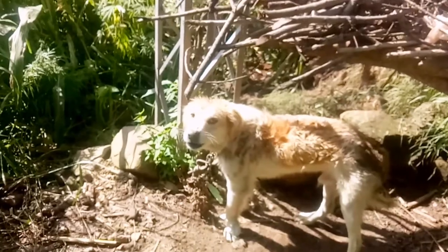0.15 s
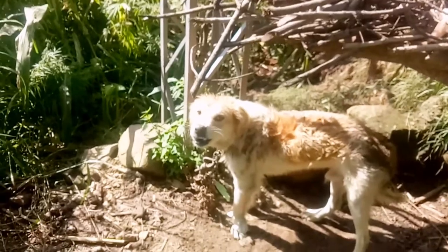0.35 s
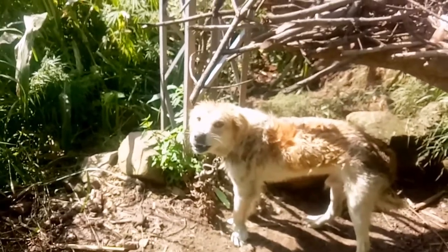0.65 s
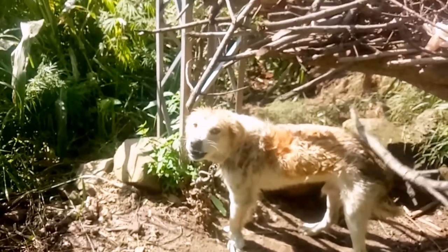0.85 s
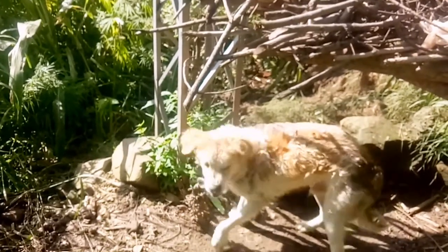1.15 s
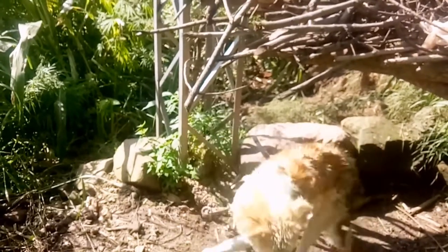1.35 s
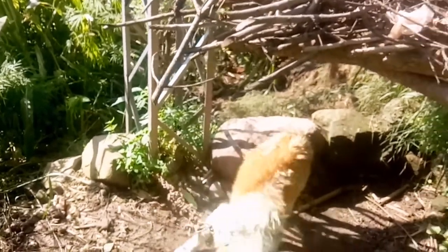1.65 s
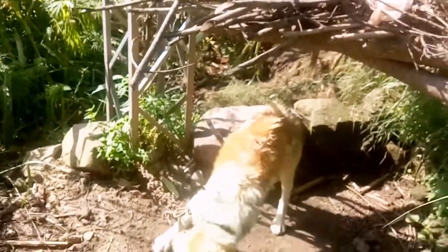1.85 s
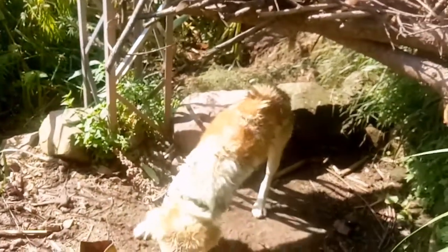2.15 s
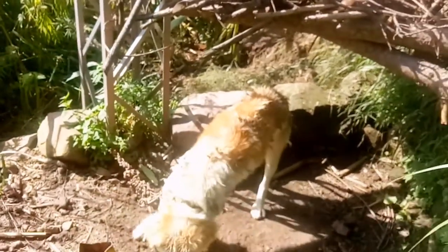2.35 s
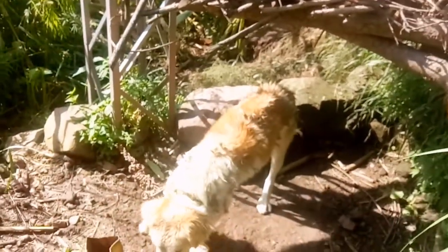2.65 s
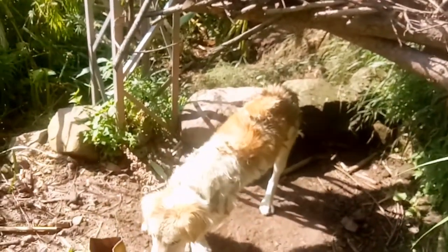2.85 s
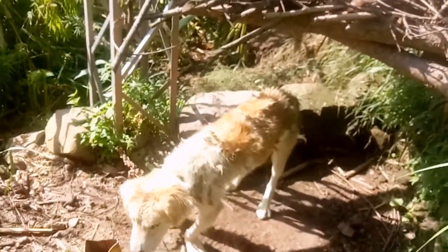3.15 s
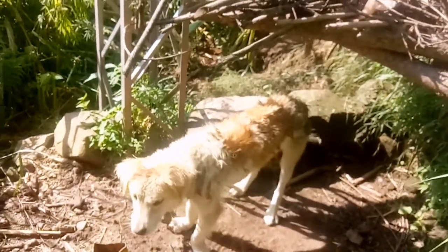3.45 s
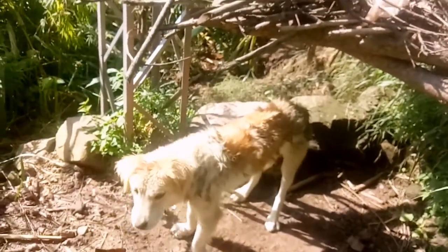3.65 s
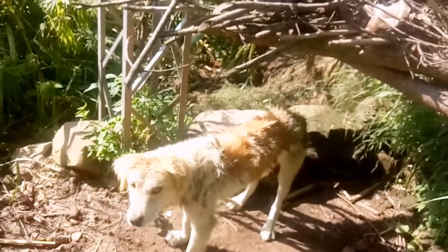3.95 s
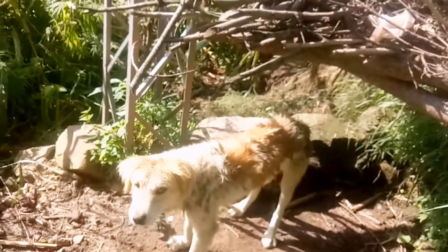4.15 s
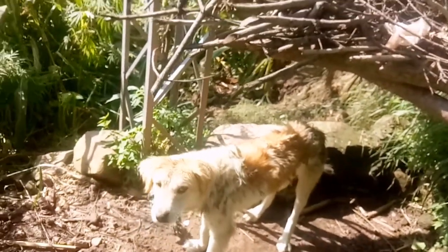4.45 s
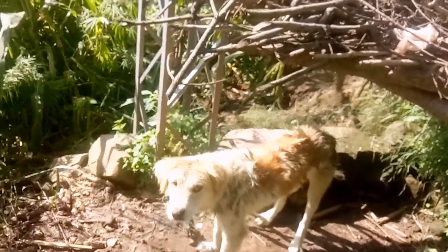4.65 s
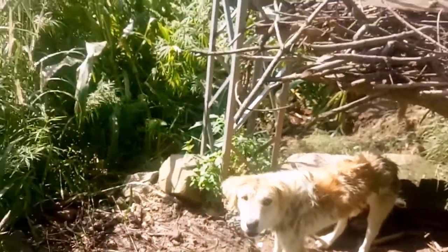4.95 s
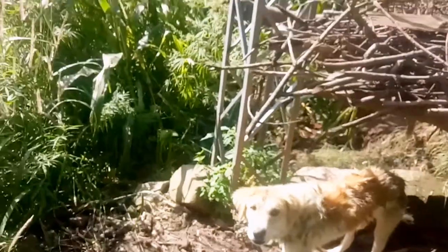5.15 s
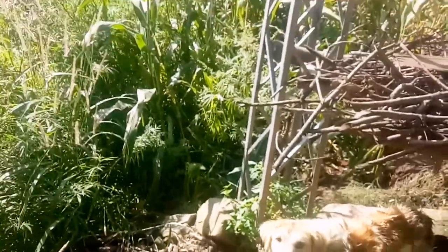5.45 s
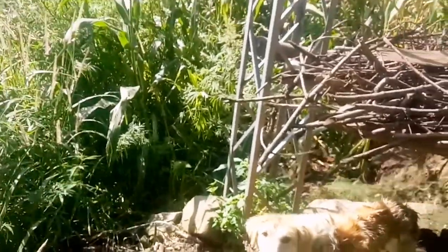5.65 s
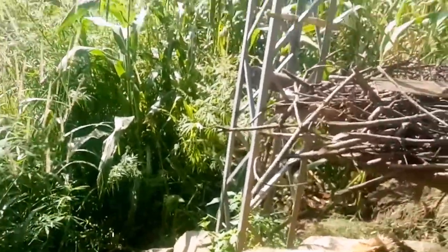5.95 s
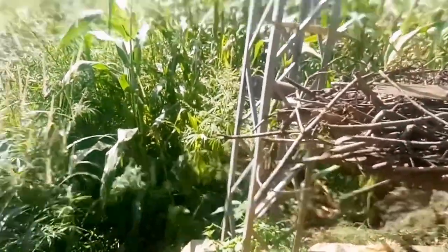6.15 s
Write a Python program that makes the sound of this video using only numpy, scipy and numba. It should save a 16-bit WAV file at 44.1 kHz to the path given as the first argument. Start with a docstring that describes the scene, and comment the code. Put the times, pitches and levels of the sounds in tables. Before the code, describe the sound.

Outdoors in a leafy yard, a thin high insect chorus and soft air continue throughout, with a nearer insect swelling now and then. From 0 to 1.2 s a close dog growls low and throaty, fluttering about 25 times a second with tiny gaps. A jaw snap and raspy puff lead into two explosive, hoarse barks at about 1.2-1.4 and 1.43-1.65 s, overloading the microphone, with faint dull echoes. A wet rattling snarl follows until 1.9 s, with paws scuffing litter. From 2.2 to 3.1 s a pitched, hoarse growl is held, becoming muffled as the mouth closes. Sharp jaw snaps and a brief soft snarl come around 3.15-3.35 s, then tiny lip smacks. Light scuffs, twig cracks and low bumps occupy 4-5 s. Softer closed-mouth throbs run from 5.25 s to the end at 6.3 s, under heavy handling knocks and rubbing from 5.8 s.

```python
"""Throbbing growls from a dog in a sunny yard come first, over insects buzzing in the plants.
Two sharp barks, begun with raspy puffs of breath, overload the input; then come a snarl, a pitched
growl held as the mouth closes, jaw snaps and softer throbs. Paws scuff dry litter, and the hand-held
microphone is jostled at the end. The voice is fold pulses, tones and noise through resonances;
the rest is coloured noise in timed swells and bursts, plus decaying tones for the bumps."""
import sys
import numpy as np
from scipy import signal
from scipy.fft import rfft, irfft, next_fast_len
from scipy.io import wavfile
from scipy.ndimage import uniform_filter1d, map_coordinates
from numba import njit

SR = 44100
rng = np.random.default_rng(int(sys.argv[2]) if len(sys.argv) > 2 else 0)


def to_wav(s):
    """Save 16-bit WAV."""
    ch = np.atleast_2d(s).T  # columns
    pcm = np.round(np.clip(ch, -1, 1) * 32767)  # PCM
    wavfile.write(sys.argv[1], SR, pcm.astype(np.int16))


N = 277256
TIME = np.arange(N) / SR


def from_db(db):
    """Amplitude gain of a level in dB."""
    return 10 ** (np.asarray(db) / 20)


def rms_one(x):
    """The same sound scaled to rms 1."""
    return x / np.sqrt(np.mean(x ** 2) + 1e-20)


def in_time(rows):
    """Each column of a curve, joined by straight lines, at every sample."""
    s, *columns = np.transpose(rows)
    return [np.interp(TIME, s, c) for c in columns]


def during(rows, fade=0.0052):
    """One while a curve lasts, fading to nothing outside it within fade seconds."""
    return np.clip(1 + np.minimum(TIME - rows[0][0], rows[-1][0] - TIME) / fade, 0, 1)


def drift(rate):
    """Random wander: rate new values a second, of spread 1, joined by straight lines."""
    knots = np.arange(int(N / SR * 2000) + 2) / rate
    return np.interp(TIME, knots, rng.standard_normal(len(knots)))


def coloured(x, spectrum):
    """Causal (minimum-phase) filter with the given (frequency [Hz], level [dB]) response."""
    size = next_fast_len(N + SR // 10, real=True) // 2 * 2
    hz, db = np.transpose(spectrum)
    bin_hz = np.arange(size // 2 + 1) * SR / size
    log_gain = np.log(from_db(np.interp(np.log(bin_hz + 1), np.log(hz), db)))
    # folding the cepstrum to positive times makes the phase minimal
    cepstrum = irfft(log_gain, size)[:size // 2]
    cepstrum[1:] *= 2
    return irfft(rfft(x, size) * np.exp(rfft(cepstrum, size)), size)[..., :N]


def noise(spectrum):
    """Noise of rms 1 with the given colour."""
    return rms_one(coloured(rng.standard_normal(N), spectrum))


@njit
def sweep(x, turn, r):
    """One two-pole resonance whose centre (radians per sample) may move."""
    y = np.zeros(len(x))
    for i in range(2, len(x)):
        driven = (1 - r * r) / 2 * (x[i] - x[i - 2])
        y[i] = driven + 2 * r * np.cos(turn[i]) * y[i - 1] - r * r * y[i - 2] + 1e-18
    return y


def resonate(x, modes, scale=1):
    """Parallel resonances (Hz, width, dB) with alternating signs, all moved by one scale."""
    out = 0
    for k, (hz, width, db) in enumerate(modes):
        turn = np.full(N, 2 * np.pi * hz / SR) * scale
        out = out + (-1) ** k * from_db(db) * sweep(x, turn, np.exp(-np.pi * width / SR))
    return out


def resonate_twice(x, mode, scale):
    """One resonance passed twice, for steeper skirts."""
    return resonate(resonate(x, [mode], scale), [mode], scale)


def band(x, low_hz, high_hz, order=4):
    """Butterworth band-pass."""
    return signal.sosfilt(signal.butter(order, [low_hz, high_hz], "band", fs=SR, output="sos"), x + 1e-18)


def evened(x, seconds):
    """The same sound with its running rms level held at 1."""
    return x / np.sqrt(np.abs(uniform_filter1d(x * x, int(seconds * SR))) + 1e-14)


def pulses(cycles):
    """A unit click at each whole cycle, when the vocal folds close."""
    return np.diff(np.floor(cycles), prepend=np.floor(cycles[0]))


def burst(start, t60):
    """Envelope that jumps to 1 and falls 60 dB in t60 seconds, cut off after a quarter second."""
    out, age = np.zeros(N + SR // 4), np.arange(SR // 4) / SR
    out[int(start * SR):][:len(age)] = from_db(-60 * age / t60)
    return out[:N]


def swell(start, hold, rise, fall):
    """Envelope that is 1 from start for the hold; rise and fall are the times for 60 dB."""
    before = (start - TIME) / max(rise, .001)
    after = (TIME - start - hold) / max(fall, .001)
    return from_db(-60 * np.clip(np.maximum(before, after), 0, 3))


def loudest_swell(rows, *rise_fall):
    """The strongest swell at each moment; rise and fall come from the rows or are shared."""
    return np.max([from_db(db) * swell(s, hold, *own, *rise_fall) for s, hold, db, *own in rows], axis=0)


def flaps(runs):
    """(s, dB) of every throat flap: each run has an even rate, may swell at first, and may sag."""
    onset_db, spread_db = -11, 0.9
    out = []
    for start, end, rate, db, attack, sag in runs:
        age = np.arange(0, end - start, 1 / rate)
        onset = onset_db * np.clip(1 - age / attack, 0, 1) * (attack > 1 / rate)
        level = db + onset - sag * age
        out += zip(start + age, level + spread_db * rng.standard_normal(size=64)[:len(age)])
    return out


def delayed(x, seconds):
    """The same sound a little later."""
    return np.interp(TIME - seconds, TIME, x, left=0)


# colour of the open air: (frequency [Hz], level [dB])
AIR_COLOUR = [(25, -8.5), (100, -5.5), (300, -20.5), (700, -14), (1500, 3), (3000, 3.5), (5000, -6),
              (8000, -37.5)]


def open_air(level_db=-45):
    """Steady coloured noise of the open air."""
    return from_db(level_db) * noise(AIR_COLOUR)


# colours of the chorus and of the nearest insect: (frequency [Hz], level [dB])
CHORUS_COLOUR = [(2500, -26), (3700, -6.5), (4300, -15), (4900, -5.5), (5300, 1.5), (5900, -5.5),
                 (6700, -12.5), (7400, -24.5), (8100, -44), (14500, -36.5), (16000, -54.5)]
CALLER_COLOUR = [(3000, -47), (3750, -18), (4050, -7), (4300, -5.5), (4550, -8), (4900, -16.5),
                 (6000, -54.5)]
# relative level of the chorus: (time [s], level [dB])
CHORUS_LEVEL = [(0, -45), (3.8, -45), (4.3, -47.5), (4.7, -44), (5.1, -44), (5.35, -46.5), (6.29, -51.5)]
# relative calls of the nearest insect: (time [s], hold [s], level [dB])
INSECT_CALLS = [(0.703, 0.87, -31.5), (2.584, 0.44, -31), (4.287, 0.46, -31.5), (4.907, 0.27, -37),
                (5.535, 0.071, -37.5), (6.076, 0.27, -40)]


def insects(throb_hz=30.8, throb_depth=0.28, chorus_db=6.5, caller_db=0.0):
    """A wide chorus of coloured noise, and one nearer insect that swells now and then in quick pulses."""
    rise_s, fall_s = 2.13, 0.49  # for 60 dB
    throb_cycles = np.cumsum(throb_hz * (1 + 0.071 * drift(2.4))) / SR
    throb = 1 + throb_depth * np.sin(2 * np.pi * throb_cycles)
    calls = loudest_swell(INSECT_CALLS, rise_s, fall_s)
    chorus = from_db(in_time(CHORUS_LEVEL)[0] + chorus_db) * noise(CHORUS_COLOUR)
    return chorus + from_db(caller_db) * calls * throb * noise(CALLER_COLOUR)


def yard(x):
    """Banks, plants and far walls scatter a thin, dull tail, different on each side."""
    t60_s, tail_db = 0.64, -25
    age = TIME[:int(1.2 * SR)]
    tails = band(rng.standard_normal((2, len(age))), 100, 1250, order=5)
    tails *= from_db(-60 * age / t60_s) * (age > .012)
    tails /= np.linalg.norm(tails, axis=1, keepdims=True)
    return from_db(tail_db) * signal.fftconvolve(x[None], tails, axes=1)[:, :N]


# returns from far walls: (delay [s], level [dB])
ECHOES = [(.335, -32), (.555, -34)]


def far_echoes(x):
    """Only the middle of the voice comes back from far walls."""
    dull = band(x, 640, 680, order=2)
    return sum(from_db(db) * delayed(dull, s) for s, db in ECHOES)


# low buffeting, relative: (time [s], hold [s], level [dB])
BUFFETS = [(4.023, 0.1, -38.5), (4.266, 0.11, -38.5), (4.787, 0.38, -40.5), (5.566, 0.2, -36.5),
           (5.837, 0.11, -29.5), (5.993, 0.202, -23)]
# colours of the buffeting and the rubbing: (frequency [Hz], level [dB])
BUFFET_COLOUR = [(20, 4), (50, 5), (85, 12), (130, 8.5), (200, -9.5), (350, -23.5), (800, -53)]
RUB_COLOUR = [(25, -25), (70, -6), (300, 7), (900, 4), (1600, -5.5), (3000, -5), (5000, -11.5), (7000, -36),
              (9000, -31.5), (15000, -45)]
# bumps on the casing, relative: (time [s], level [dB], pitch [Hz], rise [s], click level [dB])
BUMPS = [(4.268, -14.5, 91, 0.0056, -37), (4.867, -25.5, 105, 0.0055, -41),
         (4.995, -17.5, 107, 0.0058, -67), (5.819, -12.5, 155, 0.0051, -5), (5.864, -11, 264, 0.0023, -18),
         (5.919, 7, 163, 0.0022, -17), (5.982, -17, 147, 0.0029, -19.5), (6.067, -9, 177, 0.0047, -22),
         (6.163, -2.5, 151, 0.0064, -26), (6.2045, -2.5, 168, 0.00084, -6.5),
         (6.222, -13, 200, 0.0023, -10), (6.231, -9, 210, 0.003, -7), (6.247, -4, 202, 0.0034, -27)]
# fingers on the casing, relative: (time [s], hold [s], level [dB], rise for 60 dB [s], fall for 60 dB [s])
RUBS = [(5.9, 0.0065, -24, 0.25, 0.022), (5.921, 0.0024, -13, 0.0077, .008),
        (6.224, 0.17, -23, 0.0104, 0.052)]


def handling(click_s=0.025, grain_db=1.5, buffet_db=4.5, rub_db=5.5):
    """Buffeting as low noise, bumps as dull decaying tones with a noise click, rubbing as grainy noise."""
    rise_s, fall_s = 0.29, 0.34  # of a buffet, for 60 dB
    buffets = loudest_swell(BUFFETS, rise_s, fall_s)
    dull = from_db(buffet_db) * buffets * evened(noise(BUFFET_COLOUR), 0.17)
    rubbing = sum(from_db(db) * swell(s, hold, rise, fall) for s, hold, db, rise, fall in RUBS)
    scrape = from_db(rub_db + grain_db * drift(600)) * rubbing
    for s, db, hz, rise_s, click_db in BUMPS:
        age = np.clip(TIME - s, 0, .2)
        thump = (age / rise_s) ** 2 * np.exp(2 - 2 * age / rise_s)
        dull += from_db(db) * thump * np.sin(2 * np.pi * hz * age)
        scrape += from_db(click_db - 6.5) * burst(s, click_s)
    return band(dull, 55, 2800, order=2) + scrape * noise(RUB_COLOUR)


# paws and legs in litter, relative: (time [s], hold [s], level [dB], rise for 60 dB [s], fall for 60 dB [s])
SCUFFS = [(1.698, 0.2, -35, 0.41, 0.71), (1.97, 0.011, -36, .6, 0.69), (3.173, 0.0092, -31.5, 0.33, 0.73),
          (3.256, 0.054, -34, 0.72, 0.63), (3.63, 0.0071, -47, 0.29, 0.35),
          (4.004, 0.068, -48.5, 0.15, 0.9), (4.468, 0.015, -42, 0.3, 0.21),
          (5.586, 0.018, -46.5, 0.64, 0.13), (5.72, .01, -48, .1, .1)]
# colour of dry litter: (frequency [Hz], level [dB])
LITTER_COLOUR = [(200, -11.5), (700, -1), (1200, -1.5), (2000, 1), (3200, 1), (4500, -11), (7000, -21),
                 (9000, -49), (14500, -22), (16000, -41)]


def paws(grain_db=3.5, grains_per_s=350, level_db=7.5):
    """Dry litter crunches: noise whose level jitters in fine grains, shaped by each scuff."""
    scuffs = loudest_swell(SCUFFS)
    grains = rng.standard_normal(N) * from_db(grain_db * drift(grains_per_s))
    return from_db(level_db) * scuffs * rms_one(coloured(grains, LITTER_COLOUR))


# dry twigs crack under the paws, relative: (time [s], level [dB])
TWIG_CRACKS = [(4.162, -31.5), (4.286, -36), (4.7213, -30), (5.01, -33), (5.559, -26.5), (5.606, -26),
               (5.629, -32.5), (5.689, -34)]
# broad resonances of the wood: (frequency [Hz], width [Hz], level [dB])
TWIG_WOOD = [(1470, 230, -3), (2750, 1900, 7), (3800, 1300, 4)]


def twigs(crack_s=0.083, level_db=-0.5):
    """Each crack is a brief noise burst coloured by the wood's broad resonances."""
    wood = rms_one(resonate(rng.standard_normal(N), TWIG_WOOD))
    cracks = sum(from_db(db + level_db) * burst(s, crack_s) for s, db in TWIG_CRACKS)
    return band(wood, 970, 6500, order=5) * cracks


# wet lip sounds: (time [s], level [dB], decay for 60 dB [s])
SMACKS = [(3.449, -35, .11), (3.457, -35, .09), (3.618, -35.5, .09)]
# resonances of the nearly shut mouth: (frequency [Hz], width [Hz], level [dB])
SMACK_MOUTH = [(720, 130, 0), (1080, 200, -4), (1720, 280, -3)]


def smacks(level_db=0.0):
    """The lips part wetly: a small burst of noise coloured by the nearly shut mouth."""
    mouth = evened(band(resonate(rng.standard_normal(N), SMACK_MOUTH), 450, 2200, order=3), .01)
    return mouth * sum(from_db(db + level_db) * burst(s, t60) for s, db, t60 in SMACKS)


# jaw snaps, and raspy puffs of breath as each bark starts (1.226 and 1.429 s):
# (time [s], hold [s], level [dB], rise for 60 dB [s], fall for 60 dB [s], teeth over the mouth [dB])
SNAPS_AND_PUFFS = [(1.126, 0.0027, -39, .01, .03, -18), (1.193, 0.0037, -16.5, 0.048, 0.023, -2.5),
                   (1.226, 0.0087, -25, 0.039, 0.48, -3.5), (1.429, 0.0086, -16.5, 0.064, 0.057, -9),
                   (3.144, 0.004, -19, 0.012, 0.03, -16), (3.159, 0.0014, -13, 0.0033, 0.0085, -14),
                   (3.193, 0.0024, -11.5, 0.004, 0.033, -26)]
# resonances of the open mouth and of the teeth: (frequency [Hz], width [Hz], level [dB])
OPEN_MOUTH = [(927, 30, 3), (1780, 290, 0.5), (2310, 1100, -4), (2920, 400, -2.5), (4030, 690, -19.5)]
TEETH = [(3800, 300, 0)]


def jaw_snaps_and_breath_puffs():
    """Jaw snaps, and raspy puffs of breath as each bark starts: noise coloured by open mouth and teeth."""
    mouth = evened(band(resonate(rng.standard_normal(N), OPEN_MOUTH), 340, 3900, order=3), 0.01)
    teeth = evened(band(resonate(rng.standard_normal(N), TEETH), 2100, 8000, order=1), 0.012)
    out = np.zeros(N)
    for s, hold, db, rise, fall, teeth_db in SNAPS_AND_PUFFS:
        out += from_db(db) * swell(s, hold, rise, fall) * (mouth + from_db(teeth_db) * teeth)
    return out


# wet slaps of the snarl after the barks, relative: (time [s], level [dB])
RATTLES = [(1.684, -11), (1.694, -4), (1.716, 2), (1.738, 1.5), (1.761, -16), (1.78, -7), (1.797, -12),
           (1.812, -3), (1.833, -5), (1.848, -7.5), (1.871, -8.5)]
# a fast soft snarl after the snaps, relative:
# (start [s], end [s], rate [flaps/s], level [dB], attack [s], sag [dB/s])
SNARLS = [(3.24, 3.37, 150, -19, .001, 100)]
# the throat in a snarl: (frequency [Hz], width [Hz], level [dB])
SNARL_THROAT = [(112, 74, 2), (264, 144, 0), (500, 190, 1), (645, 37, 5), (858, 60, 4), (1650, 190, -12),
                (3080, 900, -10.5)]


def snarl(level_db=0.5, slap=17, wet_db=2.0):
    """Wet slaps of the throat, each a click with a short spray of noise, ring in its resonances."""
    spray_s = .04
    slaps = RATTLES + flaps(SNARLS)
    source = sum(from_db(db + wet_db) * burst(s, spray_s) for s, db in slaps) * rng.standard_normal(N)
    for s, db in slaps:
        source[int(s * SR)] += slap * from_db(db)
    return from_db(level_db) * band(resonate(source, SNARL_THROAT), 60, 4100, order=2)


def through_lips(opening, open_db, shut_db, fades_at):
    """Gain of a resonance that fades as the mouth closes past a given opening."""
    softness = 0.13  # span of opening over which it fades
    openness = 1 / (1 + np.exp((fades_at - opening) / softness))
    return from_db(shut_db + (open_db - shut_db) * openness)


# the held growl: (time [s], pitch [Hz], mouth opening [0-1])
HELD = [(2.19, 170, 1), (2.25, 196, 1), (2.34, 190, .85), (2.42, 186, .7), (2.51, 176, .55),
        (2.63, 162, .15), (2.8, 166, .05), (3.0, 177, .05), (3.08, 174, .03), (3.11, 150, 0)]
# its throat: (frequency [Hz], width [Hz], level [dB])
HELD_THROAT = [(265, 62, 1.5), (434, 68, 7), (482, 100, 3.5)]
# its mouth: (frequency [Hz], width [Hz], open level [dB], shut level [dB], opening where it fades [0-1])
HELD_MOUTH = [(679, 130, -29, -55, 0.39), (887, 80, -26.5, -68, 0.24), (1335, 190, -23, -55, 0.6),
              (1900, 156, -29, -48.5, 0.37), (2170, 480, -29.5, -62, 0.19)]
# the throat's strongest ring: (time [s], frequency [Hz], level [dB])
HELD_RING = [(2.19, 445, -43), (2.32, 440, -30), (2.37, 457, -21), (2.43, 520, -24), (2.48, 480, -30.5),
             (2.52, 513, -17.5), (2.56, 474, -40), (2.66, 448, -43.5)]


def held_growl(chest_db=-23, throat_shut_db=-35.0, throat_open_db=-24.5, throat_fades_at=0.39, rest_hz=175):
    """A chest tone under hoarse fold pulses; as the mouth closes its resonances sink and fade one by one."""
    jitter, slip, shimmer_db, rasp, under_db, flutter_db = .042, .045, 3.2, .026, -14, 1.6
    waver_db, flap_hz, flap_db = 2.8, 21, 2.3
    pitch, opening = in_time(HELD)
    cycles = np.cumsum(pitch * (1 + jitter * drift(160))) / SR
    tone = np.cos(2 * np.pi * cycles)
    closures = pulses(cycles + slip * drift(190)) * from_db(shimmer_db * drift(200))
    # breath noise swells with every cycle, strongest around the fold pulse, heard most in the mouth
    breath = rasp * (1 + tone) * rng.standard_normal(N)
    source = closures + breath
    scale = np.sqrt(pitch / rest_hz) * (1 + .02 * drift(24))
    throat = evened(band(resonate(closures + breath / 2, HELD_THROAT, scale), 210, 660), .025)
    # unequal cycles put a faint rumble around the chest tone
    voice = np.sqrt(2) * from_db(chest_db) * tone * (1 + from_db(under_db) * drift(350))
    throat_gain = through_lips(opening, throat_open_db, throat_shut_db, throat_fades_at)
    voice += throat * throat_gain * from_db(waver_db / 2 * drift(35))
    ring_hz, ring_db = in_time(HELD_RING)
    ring = resonate_twice(source, (rest_hz, 70, 0), ring_hz / rest_hz)
    voice += from_db(ring_db) * evened(ring, 0.012)
    # the loose throat still flaps, and chops the mouth's resonances
    flap_cycles = np.cumsum(flap_hz * (1 + .2 * drift(15))) / SR
    chop = from_db(flap_db * np.sin(2 * np.pi * flap_cycles))
    for hz, width, open_db, shut_db, fades_at in HELD_MOUTH:
        ringing = evened(resonate_twice(source, (hz, width, 0), scale), .04)
        ringing *= from_db(waver_db * drift(45))  # each flutters on its own
        voice += chop * ringing * through_lips(opening, open_db, shut_db, fades_at)
    effort = during(HELD, fade=0.0024) * swell(2.219, hold=0.87, rise=0.25, fall=0.27)
    return band(effort * from_db(flutter_db * drift(50)) * voice, 91, 6800, order=2)


# throbs, relative: (start [s], end [s], rate [flaps/s], level [dB], attack [s], sag [dB/s])
GROWLS = [(0, .24, 22.9, -18.6, .001, 0), (.259, .64, 24.85, -18.4, .001, 0),
          (.663, 1.13, 24.05, -17.6, .001, 2), (1.154, 1.18, 24.3, -13, .001, 0),
          (5.255, 5.6, 27.8, -21.5, .13, 5), (5.621, 5.89, 27, -24.5, .001, 8),
          (5.953, 6.29, 24.7, -25.5, .05, 12)]
# mouth shape: (time [s], upper resonances while the teeth are bared [dB], throat ring [Hz])
LIPS = [(0, -4.5, 539.4), (.7, -0.5, 565), (1.04, 1.5, 568), (1.065, -15, 504), (1.105, -30, 563),
        (1.16, -0.5, 589), (5.257, 0.5, 587), (5.34, 2, 459.4), (5.7, 4, 442.6)]
# throat with bared teeth and with the mouth nearly shut: (frequency [Hz], width [Hz], level [dB])
BARED = [(142, 98, -7), (377, 71, -4.5), (474, 44, 2), (548.4, 28, 4.5), (727, 37, 0), (1075, 16, -4),
         (1260, 76, -1.5), (1434, 64, -9.5), (1750, 110, -8.5), (2210, 56, -4.5)]
SHUT = [(107, 13.7, 3.5), (253.4, 6.1, 0), (366.6, 13, -9), (514, 120, -9.5), (640, 31, -17),
        (1480, 120, -9)]


def throbbing_growl(fold_hz=152, lead_s=0.002026, ring_db=-2.5, shut_ring_db=0.0, bared_db=-3.0,
                    shut_db=-8.0, shut_ring_hz=455, clack_db=5, ground_s=0.00217, ground_db=-8):
    """Loose throat tissue flaps some 25 times a second; each flap lets a few fold pulses through,
    the middle one hardest, and swells the throat's ring, whose pitch arches."""
    jitter, shimmer_db, rasp = .07, 2.0, .03
    bared_open_s, shut_open_s = .0175, .0128
    ring_s, ring_droop_hz, ring_scatter_hz = .0098, 20, 10
    lips_db, ring_hz = in_time(LIPS)
    bared_until = HELD[0][0]
    clicks, flow, ring = np.zeros((3, N + SR))
    order = np.arange(7) - 3
    age = np.arange(-SR // 40, SR // 40) / SR
    throbs = flaps(GROWLS)
    for (s, db), chance in zip(throbs, rng.standard_normal((len(throbs), 3, 7))):
        teeth_bared = s < bared_until
        offset = (order + jitter * chance[0]) / fold_hz
        pulse_db = shimmer_db * chance[1] + clack_db * (order == 0)
        clicks[((s - lead_s + offset) * SR).astype(int)] += from_db(pulse_db)
        near = np.round(age * SR).astype(int) + int(s * SR)
        # the flap opens and shuts quickly, leaving a gap before the next
        open_s = bared_open_s if teeth_bared else shut_open_s
        gate = from_db(db) * np.exp(-(age / open_s) ** 6)
        flow[near - int(lead_s * SR)] += gate
        # with the mouth nearly shut the ring is less even in pitch and level
        hz = np.interp(s, TIME, ring_hz) + ring_scatter_hz * chance[2, 1] * (.5 if teeth_bared else 2)
        strength = from_db(ring_db if teeth_bared else shut_ring_db + shimmer_db * chance[2, 2])
        arch_hz = hz - ring_droop_hz * (age / ring_s) ** 2
        turn = 2 * np.pi * np.cumsum(arch_hz) / SR + chance[2, 0]
        ring[near] += strength * gate * np.exp(-.5 * (age / ring_s) ** 2) * np.cos(turn)
    source = clicks[:N] + rasp * rng.standard_normal(N)
    bared = resonate(source, BARED[:5]) + from_db(lips_db) * resonate(source, BARED[5:])
    # the bounce off the ground hollows the valleys between the resonances
    bared = bared + from_db(ground_db) * delayed(bared, ground_s)
    bared = from_db(bared_db) * evened(band(bared, 80, 2080, order=6), 0.014)
    shut = band(resonate(source, SHUT, ring_hz / shut_ring_hz), 55, 950)
    shut = from_db(shut_db) * evened(shut, 0.016)
    return ring[:N] + flow[:N] * np.where(TIME < bared_until, bared, shut)


# resonances in a bark, at rest: (frequency [Hz], width [Hz], level [dB])
BARK_THROAT = [(532, 31, 2.5), (653, 64, 4), (795, 77, 2.5), (977, 156, -2)]
BARK_MOUTH = [(1536, 51, -0.5), (1717, 100, -3), (2158, 72, 15.5), (2600, 300, -16), (3094, 200, -10),
              (4410, 170, -13)]
# colour of the air rushing out with a bark: (frequency [Hz], level [dB])
BARK_AIR = [(90, 1), (400, -1.5), (3000, -12.5), (6500, -10.5), (9000, -11), (15000, -9)]


def bark(rows, half_tone=0.29, rattle_hz=138, noisiness=0.7, gating=0.27, rasp_width_hz=130, air_db=-27):
    """A high, forced voice on a moving pitch; where it is hoarse, a slower rattle of the throat
    splits it into dense sidebands."""
    jitter, tremor, rattle_depth, rattle_jitter, flutter_db = .09, .013, 1.2, .15, 5
    throat_rest_hz, mouth_rest_hz = 655, 2172
    pitch, rough, throat_hz, mouth_hz, throat_db, mouth_db, rasp_hz, rasp_db = in_time(rows)
    rough = np.clip(rough, 0, 1)
    wobble = 1 + jitter * rough * drift(450) + tremor * drift(120)
    phase = 2 * np.pi * np.cumsum(pitch * wobble) / SR
    rattle = np.cos(2 * np.pi * np.cumsum(rattle_hz * (1 + rattle_jitter * drift(150))) / SR)
    # eight harmonics, every other cycle stronger
    folds = rms_one(sum(np.cos(k * phase) for k in range(1, 9))) * (1 + half_tone * np.cos(phase / 2))
    turbulence = rms_one(band(rng.standard_normal(N), 280, 5000) * (1 + gating * np.cos(phase)))
    source = (1 - rough) * folds + noisiness * rough * turbulence
    source = source * (1 + rattle_depth * rough * rattle)
    throat = resonate(source, BARK_THROAT, throat_hz / throat_rest_hz)
    throat = evened(band(throat, 395, 1600, order=3), 0.065)
    mouth = resonate(source, BARK_MOUTH, mouth_hz / mouth_rest_hz)
    mouth = evened(band(mouth, 1200, 5000, order=2), 0.014)
    # the hoarse part rings in a resonance that sweeps up as the jaw drops and down as it closes
    jaw, ring = 2 * np.pi * rasp_hz / SR, np.exp(-np.pi * rasp_width_hz / SR)
    rasp = evened(sweep(sweep(turbulence * (1 + rattle), jaw, ring), jaw, ring), 0.016)
    throat = throat + from_db(air_db) * noise(BARK_AIR)
    voice = from_db(throat_db) * throat
    voice += from_db(mouth_db + flutter_db * rough * drift(130)) * mouth
    voice += from_db(rasp_db) * rasp
    return during(rows, fade=.008) * voice


# the two barks: (time [s], pitch [Hz], roughness [0-1], throat ring [Hz], mouth ring [Hz],
# throat level [dB], mouth level [dB], rasp [Hz], rasp level [dB])
BARKS = [
    [(1.195, 599, 0.83, 645, 1820, -26.5, -37.5, 1110, -40.5),
     (1.245, 659, 0.84, 658, 2030, -8, -17.5, 1230, -16), (1.275, 678.2, 0.73, 640, 2087, -1, 1, 1515, -15),
     (1.315, 716, 0.44, 656, 2187, -1.5, -0.5, 1570, -18.5),
     (1.338, 710, 0.7, 617, 2130, -1, 4.5, 1567, -6), (1.36, 738, 0.3, 706, 2060, -17.5, -30.5, 1425, -27),
     (1.405, 832, 0.77, 766, 2000, -39, -42.5, 1200, -46)],
    [(1.43, 759.4, .8, 780, 2383, -23, -32.5, 1002, -29),
     (1.472, 612.3, 0.7, 721, 2220, -11, -18, 1095, -9.5),
     (1.498, 616, 0.53, 658, 1900, -6, -13, 1258, -15),
     (1.518, 631.5, 0.3, 663, 1926, -4.5, 2.5, 1600, -4.5),
     (1.545, 644.7, 0, 680, 1990, -0.5, 4, 1650, -13), (1.56, 621, 0.26, 676, 1950, -0.5, -2.5, 1500, -23),
     (1.573, 448, 0.08, 510, 1870, -14, -19.5, 1080, -28),
     (1.6, 450, 0.86, 540, 1900, -22, -27.5, 940, -33), (1.645, 450, 0.8, 520, 1800, -39, -35.5, 885, -45)],
]
# short clean yelps or grunts as the voice breaks, mostly at the edges of a bark:
# (time [s], half length [s], pitch [Hz], glide [Hz/s], level [dB])
YELPS = [(1.165, 0.0018, 950, -1.5, -9.5), (1.374, 0.01, 805, 1701, -9.5), (1.473, .007, 747, 2999.5, 0),
         (1.575, 0.006, 833, -4000, -1.5), (3.195, 0.0077, 990, -2500, -13.5), (3.25, 0.016, 192, 0, -28.5)]


def barks(overtone_db=-22):
    """The barks, and brief gliding tones with a faint octave for the yelps."""
    out = sum(bark(rows) for rows in BARKS)
    for s, half_s, hz, glide, db in YELPS:
        age = TIME - s
        phase = 2 * np.pi * (hz * age + glide * age ** 2 / 2)
        tone = np.sin(phase) + from_db(overtone_db) * np.sin(2 * phase)
        out += np.sqrt(2) * from_db(db) * np.exp(-(age / half_s) ** 2) * tone
    return out


# the dog moves round to the right of the microphone and back: (time [s], lag of the left port [ms])
BEARING = [(1.7, 0.012), (2.1, 0.23), (5.1, .26), (6, 0.079)]
# the right port faces away from the scene: (frequency [Hz], level against the left [dB])
SHADOW = [(60, -6.5), (200, -7), (400, -6.5), (700, -8.5), (1300, -12.5), (2300, -17), (4400, -14),
          (8000, 4.5), (15000, -25)]


def scene(left_db=2.5, apart=0.42, right_handling_db=-12):
    """The right port is shadowed; insects surround both, and each has its own handling noise."""
    voice = throbbing_growl() + barks() + held_growl() + snarl()
    dog = voice + jaw_snaps_and_breath_puffs() + smacks()
    near = dog + paws() + twigs() + far_echoes(dog)
    lag_samples = in_time(BEARING)[0] * SR / 1000
    lagging = map_coordinates(near, [np.arange(N) - lag_samples], order=3)
    around = [insects() + open_air() for side in range(2)]
    # the two ports share part of the background
    share = np.clip(apart, 0, 1)
    around[1] = np.sqrt(1 - share) * around[0] + np.sqrt(share) * around[1]
    touch = np.array([handling(), from_db(right_handling_db) * handling()])
    left, right = np.array([lagging, near]) + touch + yard(dog) + np.array(around)
    return from_db(left_db) * np.array([left, coloured(right, SHADOW)])


def record(dry):
    """Peaks above the limit duck both channels for a moment; the input clips softly and the top is cut."""
    limit_db, attack_s, release_db_per_s, cutoff_hz = 12.5, 0.003, 97.5, 16300
    over_db = np.maximum(20 * np.log10(np.abs(dry).max(axis=0) + 1e-9) - limit_db, 0)
    recovery = release_db_per_s * TIME
    held_db = np.maximum.accumulate(over_db + recovery) - recovery
    pole = np.exp(-1 / (attack_s * SR))
    ducked = dry * from_db(-signal.lfilter([1 - pole], [1, -pole], held_db))
    clipped = .97 * ducked / (1 + ducked ** 8) ** (1 / 8)
    return signal.sosfilt(signal.cheby2(14, 60, cutoff_hz, fs=SR, output="sos"), clipped)


dry = scene()
out = record(dry)
to_wav(out)
```